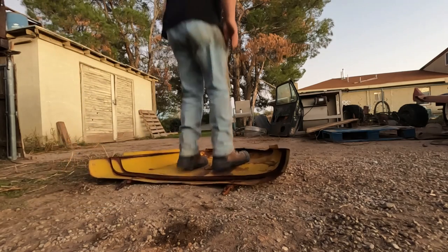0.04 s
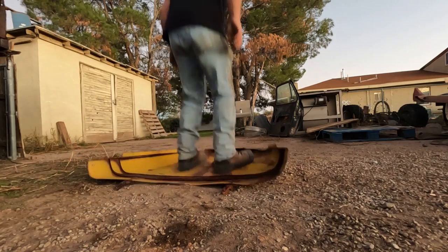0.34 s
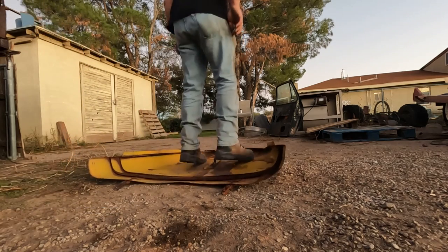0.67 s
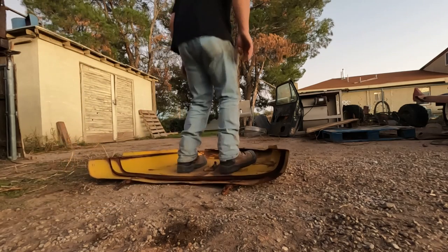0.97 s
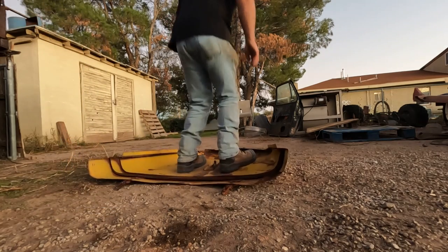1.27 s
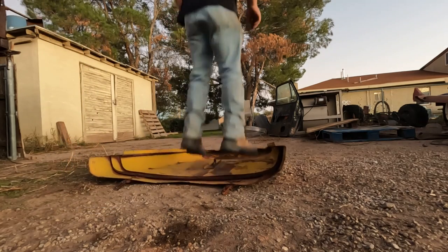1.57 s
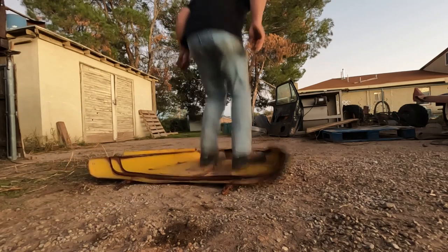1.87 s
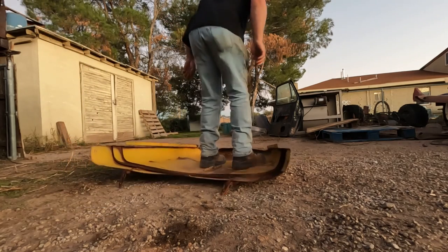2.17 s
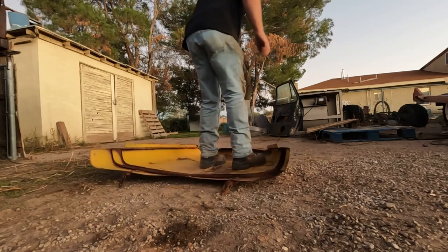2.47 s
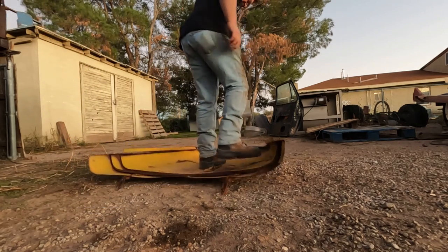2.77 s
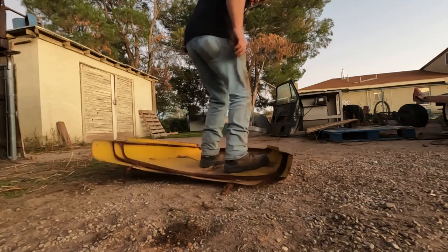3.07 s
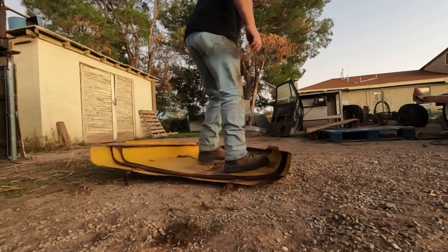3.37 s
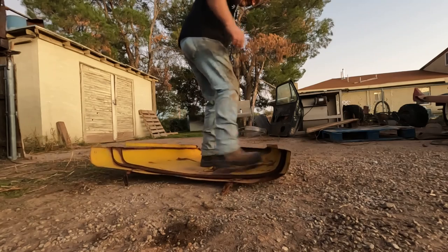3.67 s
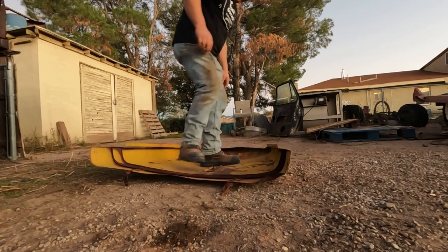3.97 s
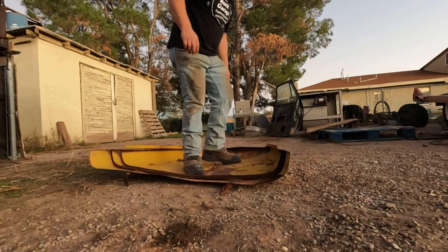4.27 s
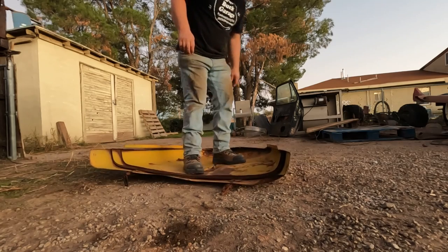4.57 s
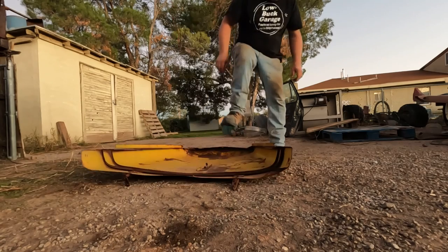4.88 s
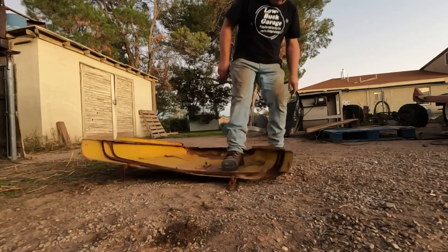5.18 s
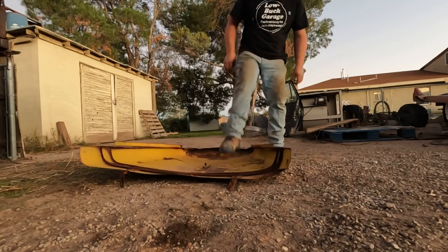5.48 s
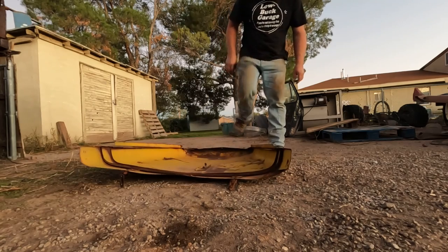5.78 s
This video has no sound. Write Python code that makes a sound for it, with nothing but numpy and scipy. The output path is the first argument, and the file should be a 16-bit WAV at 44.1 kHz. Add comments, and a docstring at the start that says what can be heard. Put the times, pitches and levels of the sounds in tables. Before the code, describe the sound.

Work boots stomp on a dented steel truck hood lying on gravel, heard close by in faint outdoor air. Loud, hollow bangs land at about 0.1 and 0.5 seconds, each buckling the sheet with a low boom and a tinny clash of skin against loose bracing. Softer crumpling and rattling follow, with faint gravel crunches around 1.4 seconds. Clatter builds into a heavy stomp just before 2 seconds. A lighter one comes at 2.7, a strong one at 3, and medium ones at 3.5 and 4.1, with bright metal chatter between them. From 2 seconds, a small steel part occasionally gives a faint high ping. After a brief lull with a gravel crunch at 4.5, a soft low rush swells from 4.7 seconds. The hardest stomp lands at 5.1, and the hood keeps rattling, weakening toward 6 seconds.

```python
"""A dented steel truck hood lies upside down on a gravel yard, in faint outdoor air. From the start,
shifting weight crumples the sheet and rattles its skin on the loose bracing. Work boots stomp at once and
keep coming: each buckles the sheet with a low boom and snaps the panel through, and the skin clashes on
the bracing. From 1.4 s gravel crunches under the rim; from 2 s a small steel part pings now and then.
Near 4.7 s a soft rush swells, the last and hardest stomp lands at 5.1 s, and the rattling dies away."""
import sys
import numpy as np
from scipy import signal
from scipy.fft import rfft, irfft
from scipy.io import wavfile
from scipy.ndimage import uniform_filter1d, map_coordinates

SR = 44100
rng = np.random.default_rng(int(sys.argv[2]) if len(sys.argv) > 2 else 0)


def transcribe(u):
    """Save the signal u as a 16-bit wav file named by the first command-line argument.

    u: samples, shape (n,) or (channels, n), limited to [-1, 1]; the rate is SR.
    q: integer samples, one column per channel.
    """
    v = np.clip(np.atleast_2d(u).T, -1, 1)
    q = np.round(v * 32767).astype(np.int16)
    wavfile.write(sys.argv[1], SR, q)


N = 261954
RING = 32768  # samples set aside for one blow to ring out
T = np.arange(RING) / SR  # seconds since the blow


def gain(db):
    """Turn decibels into a number to multiply by."""
    return 10 ** (np.asarray(db) / 20)


def fade(ring_s):
    """A dying-away curve. The ring time is how long a sound takes to drop by 60 dB."""
    return gain(-60 * T / ring_s)


def value_at(points, hz):
    """Look up a frequency in rows of (Hz, value), sliding between rows by octaves."""
    row_hz, values = np.transpose(points)
    return np.interp(np.log(np.maximum(hz, 1)), np.log(row_hz), values)


def normalize(x):
    """Scale a sound so its average (rms) level is 1."""
    return x / np.sqrt(np.mean(x ** 2))


def causal_response(log_gain):
    """Turn a gain curve into a filter response that never sounds ahead of its input."""
    cepstrum = irfft(log_gain)
    half = len(cepstrum) // 2
    cepstrum[1:half] *= 2
    cepstrum[half + 1:] = 0
    return np.exp(rfft(cepstrum))


def colour(x, tone, brightness=0):
    """Shape a sound with rows of (Hz, dB); brightness tips it toward the treble, in dB per octave."""
    hz = np.fft.rfftfreq(4096, 1 / SR)
    db = value_at(tone, hz) + brightness * np.log2(np.clip(hz, 200, 8000) / 1000)
    impulse = irfft(causal_response(np.log(gain(db))))
    return signal.fftconvolve(x, impulse)[:len(x)]


def even_out(x):
    """Spread a blow's energy evenly from bass to treble, keeping its narrow ringing notes."""
    spectrum = rfft(x, 2 * RING)
    outline = np.sqrt(uniform_filter1d(abs(spectrum) ** 2, 280) + 1e-12)
    return irfft(spectrum * causal_response(-np.log(outline)))[:RING]


def resonate(x, hz, boost, q):
    """Lift the sound around one pitch; a higher q lifts a narrower band."""
    return x + boost * signal.lfilter(*signal.iirpeak(hz, q, SR), x)


def add(out, start_s, x, db):
    """Mix a sound in so that its loudest moment has the given level."""
    i = max(int(start_s * SR), 0)
    x = x * gain(db) / np.sqrt(uniform_filter1d(x ** 2, 600).max())
    out[i:i + len(x)] += x[:max(len(out) - i, 0)]


def contacts(length_s, per_s, spread_db, first, swell):
    """One first touch, then a flurry of uneven little ones that builds up and dies away."""
    touches = rng.random(RING) < per_s / SR
    sizes = rng.choice([-1, 1], RING) * gain(spread_db * np.clip(rng.standard_normal(RING), -2, 2))
    build_up = 1 - np.exp(-T / (swell * length_s))
    force = touches * sizes * build_up * np.exp(-(T / length_s) ** 2)
    force[0] = first * min(0.022 / length_s, 2)  # quick blows begin hardest
    return force


def bounces(depth_db, per_s=26, jitter=0.35, count=64):
    """The skin bounces at uneven moments; each bounce starts hard and then weakens."""
    gaps_s = np.exp(jitter * rng.standard_normal(count)) / per_s
    bounces_so_far = np.interp(T, np.cumsum(gaps_s) - gaps_s[0], np.arange(count))
    return gain(-depth_db * (bounces_so_far % 1))


# How long the steel sheet rings. Each row: frequency in Hz, ring time in seconds.
SHEET_RING_TIMES = [(100, 0.41), (260, 0.43), (700, 0.65), (1840, 0.28), (4850, 0.069), (12000, 0.017)]
def sheet_tap(tick_db, crack_db, crack_ring_s):
    """A tap on the hood: a tick, a short crack, then a crowd of notes whose treble dies first."""
    hz = np.fft.rfftfreq(RING, 1 / SR)
    octave = np.log2(np.clip(hz, 60, 15360) / 60)
    noise_spectrum = np.exp(2j * np.pi * rng.random(len(hz)))
    attack = gain(tick_db) * np.exp(-T / 0.0011) + gain(crack_db) * fade(crack_ring_s)
    out = 0
    for k in range(9):
        band = irfft(noise_spectrum * np.maximum(1 - abs(octave - k), 0))
        tail = fade(value_at(SHEET_RING_TIMES, 60 * 2 ** k))
        out = out + normalize(band * (attack + tail)) * band.std()
    return normalize(out)


def flex(tap, retune=0.04, glide=0.0134):
    """Weight on the sheet retunes its crowd of notes, and they slide while it bends."""
    offset, slope = rng.standard_normal(2)
    speed = 1 + retune * offset + glide * slope * (1 - np.exp(-T / 0.1))
    return map_coordinates(tap, [np.cumsum(speed) - speed[0]], order=2)


# The sheet's strongest notes. Each row: pitch in Hz, relative level in dB, ring time in seconds.
SHEET_NOTES = [(283.2, -18.5, 0.79), (396, -18.5, 0.6), (616, -39.5, 0.29), (796, -13.5, 0.52),
               (1897, -14.5, 0.13), (2400, -26.5, .3), (2550, -24.5, 0.21), (2900, -37.5, .15),
               (3260, -24.5, .12), (3820, -18.5, 0.36), (4320, -41, .25), (4240, -37.5, .25),
               (4740, -23, 0.033), (5120, -29, 0.14), (5500, -21.5, 0.18), (5880, -27.5, 0.13)]
def strike_sheet(rows, tone, tap, per_s, spread_db, first, swell, notes_db, boom, bounce_db=0):
    """Each blow is a flurry of contacts that rings the sheet; each spot favours different notes."""
    out = np.zeros(N)
    notes = np.array([gain(db) * normalize(np.sin(2 * np.pi * hz * T) * fade(ring_s))
                      for hz, db, ring_s in SHEET_NOTES])
    for start_s, db, length_s, brightness, drum_hz in rows:
        spot = flex(tap) + gain(notes_db) * rng.standard_normal(len(notes)) @ notes
        bite = first * gain(0.44 * (db + 21.5))  # light touches start softly
        force = contacts(length_s, per_s, spread_db, bite, swell) * bounces(bounce_db)
        ringing = even_out(signal.fftconvolve(force, spot)[:RING])
        ringing = resonate(ringing, drum_hz, boom, q=2.4)
        add(out, start_s, colour(ringing, tone, brightness), db)
    return out


# The tone of the open air. Each row: frequency in Hz, relative level in dB.
AIR_TONE = [(25, -13.5), (70, -6), (170, 9), (400, 2), (750, -16), (1100, -19), (2500, -18), (4500, -24.5),
            (8000, -31), (15000, -44)]
def air(level_db=-55.5):
    """Faint outdoor air: a steady, low noise."""
    return gain(level_db) * normalize(colour(rng.standard_normal(N), AIR_TONE))


DRUM_HZ = 318  # the panel's drum-like pitch between stomps
# The tone of a boot on the sheet. Each row: frequency in Hz, relative level in dB.
BOOT_TONE = [(25, -51), (60, -12), (100, -14.5), (170, 4.5), (330, 4), (600, 4), (850, 0.5), (1200, -6),
             (2000, -13), (4000, -23.5), (7000, -38.5), (15000, -59)]
# The weight shifts and the hood rocks. Each row: start in seconds, bending time in seconds,
# crumple level in dB, relative rattle level in dB.
WEIGHT_SHIFTS = [(0.0, 0.055, -19, -26), (.112, 0.033, -18, -15.5), (.19, .26, -13, -19),
                 (.515, 0.076, -31, -34.5), (.872, 0.13, -25, -32.5), (1.33, 0.19, -44, -65),
                 (1.588, 0.07, -31, -48), (1.66, 0.26, -31, -24), (2.04, 0.16, -19.5, -23),
                 (2.299, 0.39, -44, -49), (2.62, 0.09, -29, -27.5), (2.72, 0.17, -29, -25),
                 (3.099, 0.26, -21.5, -19), (3.57, 0.12, -32.5, -30.5), (4.18, 0.14, -20.5, -21.5),
                 (4.395, 0.12, -30, -28), (5.21, 0.24, -20, -19), (5.52, 0.19, -27, -26),
                 (5.68, 0.16, -33.5, -32)]
def crumple(tap, brightness=1.0):
    """Shifting weight keeps the sheet giving way in many tiny buckles."""
    rows = [(start_s, db, length_s, brightness, DRUM_HZ) for start_s, length_s, db, _ in WEIGHT_SHIFTS]
    return strike_sheet(rows, BOOT_TONE, tap, per_s=1000, spread_db=4, first=2, swell=0.06,
                        notes_db=-16, boom=0.61)


# The tone of steel hitting steel. Each row: frequency in Hz, relative level in dB.
STEEL_TONE = [(40, -36), (130, -15), (300, -1.5), (800, 0), (1500, -1), (2000, 4), (2500, 4.5),
              (3050, -0.5), (3500, 2), (5000, -6.5), (7000, -21), (8200, -36), (10300, -29), (12000, -69),
              (15000, -55.5)]
def rattle(tap, brightness=-0.8):
    """Each time the weight shifts, the hood rocks and its skin bounces on the loose bracing."""
    rows = [(start_s, db, length_s, brightness, DRUM_HZ) for start_s, length_s, _, db in WEIGHT_SHIFTS]
    return strike_sheet(rows, STEEL_TONE, tap, per_s=800, spread_db=7, first=2.5, swell=0.04,
                        notes_db=-11, boom=0.05, bounce_db=12)


def bracing(hits, level_db=-1.71):
    """The bracing adds two tinny resonances to whatever hits it."""
    tinny = resonate(hits, hz=2600, boost=0.33, q=3.8)
    return resonate(tinny, hz=3440, boost=0.23, q=10) * gain(level_db)


# A boot lands. Each row: start in seconds, level in dB, buckling time in seconds,
# brightness in dB per octave, the panel's drum pitch at that spot in Hz.
BOOT_STOMPS = [(.083, -14.5, 0.0055, -1.5, 186), (.154, -10, 0.067, 2, 186), (0.421, -8.5, 0.017, 1, 179),
               (0.4957, -14, 0.0076, 2, 200), (1.465, -28.5, .02, -3.5, 193), (1.9354, -8.5, 0.043, 2, 208),
               (1.975, -12, 0.055, 1.5, 238), (2.597, -23, 0.036, 0.5, 297), (2.679, -20.5, 0.069, 2, 283),
               (3.042, -14.5, 0.022, 3, 353), (3.064, -11, 0.027, 1, 321.4),
               (3.515, -19, 0.027, 2.5, 334.6), (4.117, -18, 0.039, 3.5, 278.5),
               (4.145, -18, 0.025, -2.5, 402), (5.1239, -10, 0.008, 4, 177), (5.133, -5.5, .016, 1, 347),
               (5.178, -13.5, 0.029, 0.5, 276)]
def stomps(tap):
    """Each landing boot buckles the sheet with a low boom."""
    return strike_sheet(BOOT_STOMPS, BOOT_TONE, tap, per_s=1000, spread_db=5.5, first=2.54, swell=0.066,
                        notes_db=-11.5, boom=1.0)


def panel_snaps(offset_db=-2.5, delay_s=0.004, ring_s=0.15, sag=0.053, full_snap_s=0.033):
    """The panel snaps under each boot: two drum notes start high and settle as its swing shrinks."""
    out = np.zeros(N)
    for start_s, db, length_s, _, drum_hz in BOOT_STOMPS:
        phase = 2 * np.pi * drum_hz * np.cumsum(1 + sag * np.exp(-T / 0.03)) / SR
        notes = np.sin(phase) + gain(-5) * np.sin(1.62 * phase)
        snap = notes * (1 - np.exp(-T / 0.003)) * fade(ring_s)
        push = np.clip(length_s / full_snap_s, 0.1, 1)  # a short push snaps it only partway
        add(out, start_s + delay_s, snap, db + offset_db + 20 * np.log10(push))
    return out


# Hard hits on the bracing. Each row: start in seconds, relative level in dB,
# chatter time in seconds, brightness in dB per octave.
SKIN_CLASHES = [(.088, -14, 0.024, -0.5), (.318, -24, 0.013, 2), (.378, -22, 0.032, 1),
                (.4198, -11, 0.0029, -5.5), (.4958, -11, 0.0072, -4.5), (0.727, -36.5, 0.031, -3.5),
                (.808, -36.5, 0.028, -2.5), (0.849, -25, 0.017, -1), (.89, -23.5, 0.02, 2.5),
                (.936, -24.5, 0.02, 1.5), (1.016, -30, 0.021, -1.5), (.968, -30, 0.021, 0),
                (1.096, -31.5, 0.0084, -6.5), (1.571, -34, .011, -4), (1.644, -19, 0.029, -2),
                (1.725, -23.5, 0.023, 3), (1.762, -16, 0.053, -0.5), (1.852, -19.5, 0.018, -2),
                (1.918, -21, 0.014, 1.5), (1.9347, -16, 0.0024, 10.5), (1.952, -19.5, .025, 9.5),
                (2.158, -20.5, 0.03, 3), (2.198, -24.5, 0.016, -0.5), (2.268, -25.5, 0.016, -2),
                (2.383, -35.5, .008, -2), (2.484, -31, .016, -1.5), (2.691, -17, 0.038, 5.5),
                (2.806, -22, 0.0063, 4.5), (2.931, -29.5, 0.017, -5.5), (3.041, -21.5, 0.064, 6),
                (3.175, -25.5, 0.011, 2.5), (3.1995, -11.5, 0.011, 9), (3.254, -16, 0.037, 0),
                (3.303, -12.5, 0.014, 6.5), (3.362, -21, 0.033, 0), (3.408, -18.5, 0.031, -1.5),
                (3.49, -18, 0.034, 1), (3.629, -21, .016, -1), (4.122, -19.5, 0.075, 6.5),
                (4.215, -13.5, 0.015, 7), (4.286, -15.5, 0.026, 4.5), (5.1245, -37, .004, 7),
                (5.134, -21, 0.076, 8), (5.294, -16.5, 0.076, 5), (5.372, -16, 0.02, 6.5),
                (5.52, -21, 0.064, 3), (5.564, -17, 0.025, 1), (5.647, -20, 0.033, 4),
                (5.738, -27, 0.027, 0.5), (5.789, -26.5, 0.034, -1.5)]
def clashes(tap):
    """Now and then the skin slams into the bracing and chatters briefly."""
    rows = [(*row, DRUM_HZ) for row in SKIN_CLASHES]
    return strike_sheet(rows, STEEL_TONE, tap, per_s=900, spread_db=5, first=1.44, swell=0.071,
                        notes_db=-8, boom=0.03)


# The tone of the stones. Each row: frequency in Hz, relative level in dB.
GRAVEL_TONE = [(100, -4), (600, 3), (2000, 11.5), (4000, 5.5), (7000, -7), (8500, -23), (10500, -14),
               (15000, -73)]
# The rim grinds the gravel. Each row: start in seconds, level in dB, length in seconds.
GRAVEL_CRUNCHES = [(1.382, -43.5, 0.042), (1.418, -44, 0.036), (1.558, -45, 0.026), (2.422, -38.5, 0.023),
                   (3.815, -51.5, 0.033), (4.01, -56, 0.054), (4.517, -33, 0.012), (4.593, -53, 0.018)]
def gravel():
    """Stones under the rim tick against each other, each tick with a short, dry tail."""
    out = np.zeros(N)
    tick = rng.standard_normal(RING) * (np.exp(-T / 0.00085) + 0.032 * np.exp(-T / 0.056))
    for start_s, db, length_s in GRAVEL_CRUNCHES:
        force = contacts(length_s, per_s=680, spread_db=2, first=0.78, swell=0.11)
        crunch = signal.fftconvolve(force, tick)[:RING]
        add(out, start_s, colour(crunch, GRAVEL_TONE), db)
    return out


# A small, loose steel part is jolted. Each row: start in seconds, level in dB, ring time in seconds.
PART_PINGS = [(2.052, -43, 0.4), (2.692, -35, 0.31), (2.807, -43, 0.2), (5.31, -41, 0.43),
              (5.659, -46.5, 0.51)]
def pings(hz=6762, twin_gap_hz=70, waver=0.45, attack_s=0.0094):
    """The small part rings one high note, which wavers against a quieter twin just above it."""
    out = np.zeros(N)
    note = np.sin(2 * np.pi * hz * T) + waver * np.sin(2 * np.pi * (hz + twin_gap_hz) * T)
    for start_s, db, ring_s in PART_PINGS:
        add(out, start_s, note * (1 - np.exp(-T / attack_s)) * fade(ring_s), db)
    return out


# The tone of the soft rush. Each row: frequency in Hz, relative level in dB.
RUSH_TONE = [(25, -23), (70, -6.5), (210, 9.5), (500, 0.5), (1000, -4), (2000, -14), (4000, -28),
             (7000, -47.5), (15000, -65)]
# How the rush rises and falls. Each row: time in seconds, level in dB.
RUSH_SWELL = [(4.73, -65.5), (4.752, -39.5), (4.9, -38), (5.112, -34.5), (5.25, -43), (5.6, -60)]
def rush():
    """A soft, low noise swells before the last stomp and fades after it."""
    level_db = np.interp(np.arange(N) / SR, *np.transpose(RUSH_SWELL))
    return gain(level_db) * normalize(colour(rng.standard_normal(N), RUSH_TONE))


def scene():
    """Boots and bracing ring the same sheet; the smaller sounds join them in one channel."""
    tap = sheet_tap(tick_db=9.5, crack_db=9, crack_ring_s=0.053)
    boots = stomps(tap) + crumple(tap) + panel_snaps()
    clatter = bracing(rattle(tap) + clashes(tap))
    return (boots + clatter + pings() + gravel() + air() + rush())[None]


def record(dry, notch_hz=9000, notch_width_hz=1800, low_cut_hz=28, dull_hz=12000, top_hz=14800):
    """The microphone thins the deep bass, dips and dulls the treble, rounds peaks and cuts the top."""
    x = signal.lfilter(*signal.iirnotch(notch_hz, notch_hz / notch_width_hz, SR), dry)
    x = signal.sosfilt(signal.butter(2, [low_cut_hz, dull_hz], "band", fs=SR, output="sos"), x)
    x = x / (1 + (x / 0.98) ** 6) ** (1 / 6)  # round off the loudest peaks
    return signal.sosfilt(signal.ellip(8, 0.2, 80, top_hz, fs=SR, output="sos"), x)


dry = scene()
out = record(dry)
transcribe(out)
```